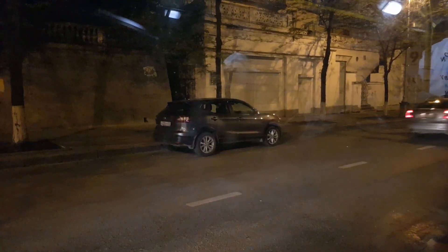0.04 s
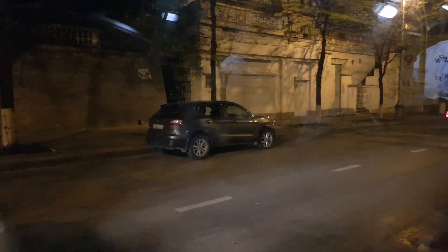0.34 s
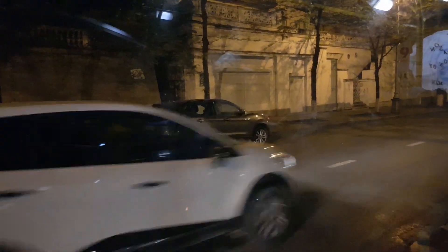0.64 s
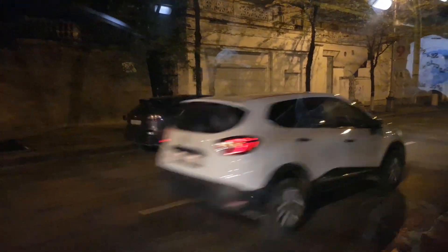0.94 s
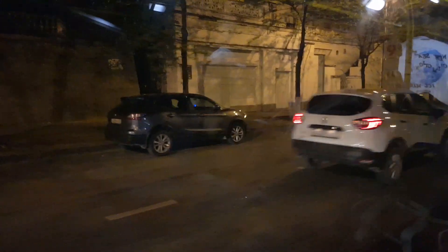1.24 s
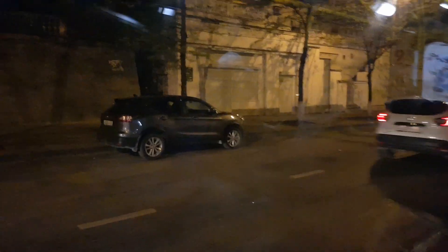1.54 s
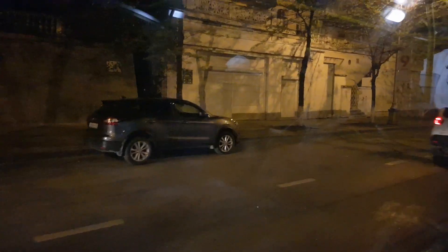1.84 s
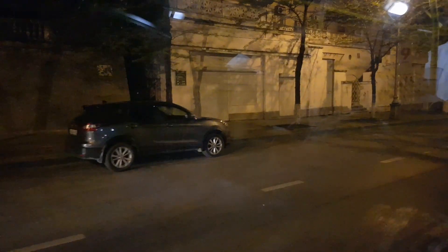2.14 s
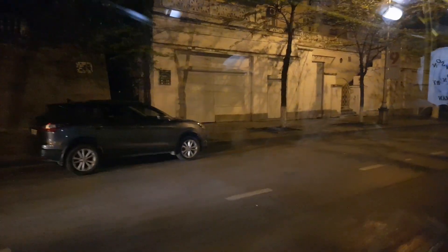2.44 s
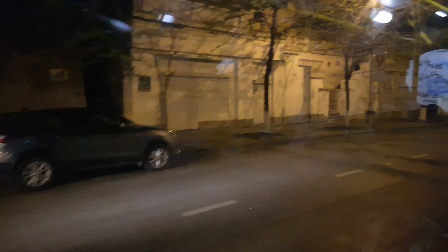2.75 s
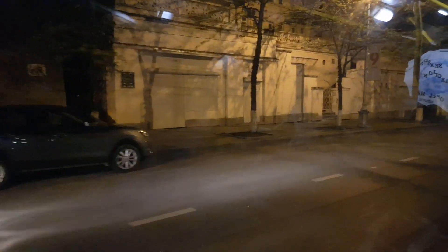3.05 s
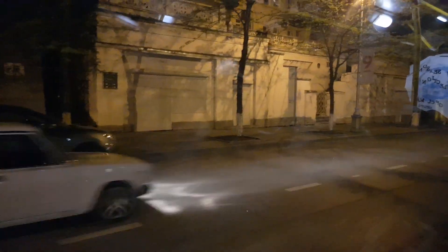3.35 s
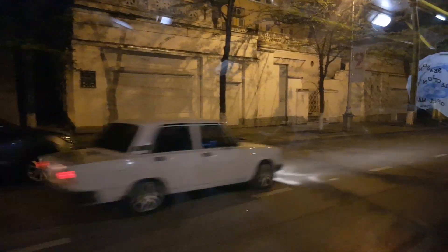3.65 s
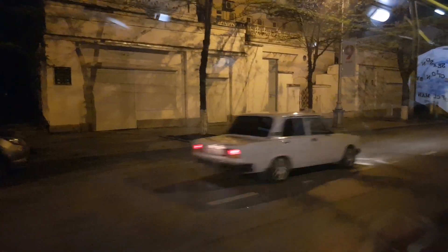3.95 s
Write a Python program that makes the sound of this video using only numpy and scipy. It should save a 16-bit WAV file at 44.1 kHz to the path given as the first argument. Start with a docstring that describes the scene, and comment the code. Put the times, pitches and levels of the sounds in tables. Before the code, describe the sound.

Low rumble of two passing cars fills an idling car's cabin, with soft rattles.

```python
"""Two cars pass on a night street, one accelerating and one droning by, and the harmonics of their exhaust
pulses boom in the cabin of an idling car. Their tyres wash by as broadband noise that excites the cabin's
resonances, over road rumble and brief hums. The idling engine adds low orders and a faint gear whirr.
Air hisses on the right with a thin blower whine. Loose trim rings in short, soft rattles,
the first two with low thumps, and faint squeaks sound at the top of hearing."""
import sys
import numpy as np
from scipy.fft import rfft, irfft, next_fast_len
from scipy.io import wavfile
from scipy.ndimage import map_coordinates

SR = 44100
rng = np.random.default_rng(int(sys.argv[2]) if len(sys.argv) > 2 else 0)


def unload_audio(sound):
    """Save the sound as a 16-bit wav file, at the path given as the first command line argument."""
    columns = np.transpose(np.atleast_2d(sound))
    # keep every value between -1 and 1, then stretch to whole-number steps
    steps = np.round(np.clip(columns, -1, 1) * 32767)
    wavfile.write(sys.argv[1], SR, steps.astype(np.int16))


N = 176400

# The passing cars' exhaust notes. Each row: time in seconds, firing rate in Hz, level in dB.
ACCELERATING_CAR = [(.6, 31.36, -65), (.85, 37.76, -31.5), (1.0, 43.66, -30.5), (1.13, 46.84, -23),
                    (1.27, 53.4, -19.5), (1.43, 57.3, -22), (1.55, 64.5, -27.5), (1.7, 68, -27),
                    (1.79, 68.5, -18.5), (1.89, 74.25, -24), (1.96, 75.7, -35), (2.4, 83.4, -39),
                    (2.6, 85.5, -70)]
DRONING_CAR = [(2.2, 58, -65), (2.36, 58.1, -40), (2.45, 56.56, -21), (2.68, 57.03, -30),
               (2.82, 57.7, -26.5), (3.35, 57.17, -22), (3.55, 56.37, -20), (3.85, 55.8, -18),
               (4, 54.74, -17)]
# The exhaust's harmonics. Each row: multiple of the firing rate, gain in dB.
EXHAUST_HARMONICS = [(1, -0.5), (2, -14.5), (3, -17.5)]
LOW_RIGHT_DB = -15.5  # exhausts and thumps are weaker in the right ear

def exhaust(car):
    """Periodic exhaust pulses form a harmonic series on the firing rate, heard mostly on the left."""
    hz, db = curves(car)
    hz = hz * (1 + 0.015 * wobble(15))
    note = sum(amp(gain) * tone(k * hz) for k, gain in EXHAUST_HARMONICS)
    return note * amp(db + 0.46 * wobble(15)) * amp([[0], [LOW_RIGHT_DB]])


# Street noise spectra. Each row: frequency in Hz, left and right density in dB per Hz before the gain.
BOOM_SPECTRUM = [(15, -84, -84), (28, -76, -80), (35, -65, -71), (44, -36.5, -61), (60, -44.5, -57),
                 (78, -38.5, -55.5), (95.3, -49.5, -58), (141, -88, -101), (300, -120, -120)]
ROAD_SPECTRUM = [(49.4, -65, -102), (95, -57.5, -65.5), (123, -46, -64.5), (144.5, -55.5, -67),
                 (220, -55, -70), (262, -58.5, -66), (310, -64, -67.5), (443, -77.5, -73.5),
                 (860, -77.5, -82), (2000, -130, -130)]
TYRE_SPECTRUM = [(150, -77, -85), (334, -67.5, -74), (470, -69.5, -66.5), (697, -69.5, -70),
                 (842, -74.5, -79), (1050, -75.5, -74), (1164, -78.5, -77.5), (1387, -75, -70.5),
                 (2060, -85.5, -75), (2430, -96, -84), (3980, -110, -105), (8000, -150, -140)]
# The swell of each noise. Each row: time in seconds, gain in dB.
BOOM_GAIN = [(0, -16), (.1, -12), (.3, -8.5), (.7, -10.5), (1.2, -7.5), (2.0, -5), (2.7, -6.5), (3.3, -4.5),
             (3.8, -5), (4, -9)]
ROAD_GAIN = [(0, -1.5), (.3, -1.5), (.65, -3.5), (1.1, -2), (1.8, 0.5), (2.3, 1.5), (2.9, 0.5), (3.1, 5.5),
             (3.35, 7.5), (3.7, -0.5), (4, -2)]
TYRE_GAIN = [(0, -1.5), (.68, -2), (.79, -1), (.9, -1.5), (1.2, -0.5), (2.3, -0.4), (2.6, 1), (2.9, 2.5),
             (3.3, -2), (3.65, -0.5), (4, -5)]
# Cabin resonances. Each row: centre in Hz, width in Hz, left and right peak in dB before the gain.
CABIN_MODES = [(255.5, 33, -59.5, -63.5), (325.5, 17, -59, -67), (370.4, 11, -61, -59.5),
               (482.7, 34, -70, -62), (962, 65, -73, -74.5)]

def street():
    """Forced resonance: broadband tyre noise drives the cabin's modes, above low boom and road rumble."""
    boom = noise(BOOM_SPECTRUM, alike=1.0) * amp(curves(BOOM_GAIN)[0] + 1.03 * wobble(6.74))
    road = noise(ROAD_SPECTRUM, alike=0.93, lag_s=0.00048)
    road *= amp(curves(ROAD_GAIN)[0] + 0.4 * wobble(8.6))
    tyres = noise(TYRE_SPECTRUM, alike=0.54, lag_s=0.00023) + ringing(CABIN_MODES, alike=0.47)
    tyres *= amp(curves(TYRE_GAIN)[0] + 1.37 * wobble(24.74))
    return boom + road + tyres


# Hums in the traffic. Each row: peak time in seconds, pitch in Hz, right level in dB,
# half length in seconds, left ear's gain in dB.
TRAFFIC_HUMS = [(0.785, 107.7, -39.5, 0.026, 13.5), (0.79, 380, -37.5, 0.025, -1),
                (1.071, 138.8, -44, 0.042, 15), (1.084, 335, -45, 0.091, -14),
                (1.54, 181, -44, 0.085, 15.5), (1.695, 331.1, -39.5, .055, -17),
                (2.804, 342.5, -39, 0.047, -3), (2.852, 392, -38.5, 0.04, -4), (2.972, 443, -37, 0.085, -6),
                (3.009, 179.9, -39.5, 0.065, 12.5)]

def hums():
    """Brief wavering tones swell as the cars go by, placed by interaural time and level differences."""
    both = sum(amp(db) * swell(s, half) * tone(hz + 4 * wobble(30)) * amp([[left], [0]])
               for s, hz, db, half, left in TRAFFIC_HUMS)
    return filtered(both, lambda hz: left_delay(hz, lag_s=0.0004))


# Engine and gear orders. Each row: multiple of the firing rate, left and right level in dB.
ENGINE_ORDERS = [(1, -36.5, -53), (2, -41, -53), (3, -38, -57.5), (4, -43.5, -59.5), (5, -49.5, -62.5)]
GEAR_ORDERS = [(15, -61, -58), (20, -63, -60), (27, -58, -56), (28, -52, -52), (29, -66, -56),
               (31, -68, -60), (32, -66, -57)]
# The swell of the gear whirr. Each row: time in seconds, gain in dB.
GEAR_GAIN = [(0, -16), (1.0, -2.5), (1.55, -4), (1.78, 1.5), (1.95, -0.5), (2.15, -7.5), (2.42, -0.5),
             (2.6, -5), (3.45, -6), (3.65, -2.5), (4, -8)]
FIRING_HZ = 60.61

def idle():
    """Steady rotation sounds at multiples of the firing rate: low engine orders and a thin gear whirr."""
    hz = FIRING_HZ * (1 + 0.001 * wobble(12))
    low = sum(amp([[left], [right]]) * tone(k * hz + 1.314 * wobble(14)) * amp(2 * wobble(12))
              for k, left, right in ENGINE_ORDERS)
    # fast frequency modulation blurs each gear order by a few Hz
    whirr = sum(amp([[left], [right]]) * tone(k * hz + 4 * wobble(60)) * amp(2.2 * wobble(14))
                for k, left, right in GEAR_ORDERS)
    whirr = filtered(whirr, lambda f: left_delay(f, lag_s=0.00012))
    return low + whirr * amp(curves(GEAR_GAIN)[0])


# Air hiss. Each row: frequency in Hz, left and right density in dB per Hz before the gain.
AIR_SPECTRUM = [(400, -100, -140), (1060, -87, -83.5), (1860, -83, -76), (2540, -91.5, -77.5),
                (3600, -97.5, -79.5), (5040, -99, -78.5), (6170, -107, -80), (7110, -123, -88.5),
                (8000, -136, -105), (8820, -132, -97), (12100, -115, -94), (14000, -116, -98),
                (16000, -117, -97)]
# The drift of the hiss. Each row: time in seconds, gain in dB.
AIR_GAIN = [(0, 0), (.17, -1.2), (.45, -0.5), (.8, -0.5), (1.3, .5), (2.6, 0.4), (3.4, 0.5), (3.75, -1),
            (4, -2.5)]
# The blower's whine. Each row: time in seconds, pitch in Hz, right level in dB.
BLOWER_WHINE = [(0, 3015, -76), (.55, 3000, -59), (.9, 3010, -57), (1.4, 2997, -47.5), (1.95, 3000, -53.5),
                (2.3, 3014, -51.5), (2.6, 2996, -57), (2.9, 2972, -56.5), (3.15, 2968, -53),
                (3.7, 2976, -58), (4, 3002, -60)]
WHINE_NOISE_SHARE = 0.45

def ventilation():
    """Moving air hisses; random modulation spreads part of the blower's tone into a narrow band."""
    air = noise(AIR_SPECTRUM, alike=0.058) * amp(curves(AIR_GAIN)[0] + 0.41 * wobble(20))
    hz, db = curves(BLOWER_WHINE)
    flutter = np.sqrt(WHINE_NOISE_SHARE / 2) * (wobble(80) + 1j * wobble(80))
    carrier = np.exp(2j * np.pi * np.cumsum(hz) / SR)
    whine = unit(np.real((np.sqrt(1 - WHINE_NOISE_SHARE) + flutter) * carrier))
    return air + whine * amp(db) * amp([[-17], [0]])


# Trim rattles. Each row: start in seconds, noise gain in dB, tilt in dB per octave,
# time to fall 60 dB in seconds, the loose part's pitch in Hz, its right level in dB.
TRIM_RATTLES = [(0.1, -7, -1.5, 0.11, 1400, -41.5), (0.515, -12, 5.5, 0.34, 2960, -46.5),
                (1.162, -13, -11, 0.027, 700, -48), (2.698, -11, 4.5, 0.25, 2940, -45),
                (3.096, -1, -4, 0.17, 4380, -46), (3.108, -5, -1, 0.24, 1380, -38.5)]
# Rattle noise. Each row: frequency in Hz, left and right density in dB per Hz before gain and tilt.
TRIM_SPECTRUM = [(250, -80, -74), (710, -75, -66), (1300, -70, -73), (2000, -80, -63.5), (2670, -80, -64),
                 (3570, -92, -70.5), (5500, -94, -71), (6500, -103, -74), (8200, -130, -102),
                 (8900, -120, -85.5), (12500, -108, -88), (15500, -115, -89)]
# Trim modes. Each row: centre in Hz, width in Hz, left and right peak in dB before gain and tilt.
TRIM_RESONANCES = [(1060, 35, -62, -56), (1187, 36, -65, -55), (1410, 36, -76, -72), (1896, 22, -60, -53),
                   (2530, 86, -72, -59.5), (3040, 54, -94, -76), (4480, 99, -87, -68), (5050, 70, -90, -66)]
RATTLE_RISE_S, RATTLE_HOLD_S = 0.007, 0.016

def rattles():
    """Damped vibration: grainy bursts ring the trim's modes and the loose part's note, then decay."""
    grains = unit(amp(1.3 * wobble(400)))
    octaves = lambda hz: np.log2(np.clip(hz, 500, 4000) / 2000)
    out = np.zeros((2, N))
    for s, db, tilt_db, t60, ring_hz, ring_db in TRIM_RATTLES:
        t = clock() - s
        rise = np.clip(t / RATTLE_RISE_S, 0, 1)
        decay = amp(-60 * np.maximum(t - RATTLE_HOLD_S, 0) / t60)
        trim = grains * noise(TRIM_SPECTRUM, alike=0.077) + ringing(TRIM_RESONANCES, alike=0.043)
        trim = filtered(trim, lambda hz: amp(db + tilt_db * octaves(hz)))
        ring = tone(ring_hz + 22 * wobble(300)) * amp(ring_db) * amp([[-10], [0]])
        out += rise * decay * (ring + trim)
    return out


# Jolts that come with the first rattles. Each row: peak time in seconds, left level in dB.
BODY_JOLTS = [(.115, -27), (.51, -22)]
THUMP_HZ, THUMP_HALF_S = 61.4, 0.017

def thumps():
    """Transient response: the car's body gives a few low cycles at each jolt."""
    body = sum(amp(db) * swell(s, THUMP_HALF_S) * tone(np.full(N, THUMP_HZ)) for s, db in BODY_JOLTS)
    return body * amp([[0], [LOW_RIGHT_DB]])


# Thin squeaks. Each row: peak time in seconds, right level in dB, half length in seconds.
HIGH_SQUEAKS = [(.3, -57, .02), (.48, -57, .01), (1.045, -53, .025), (1.217, -54, 0.034),
                (1.557, -56, 0.012), (1.617, -56, 0.035), (1.787, -51, 0.011), (1.899, -51, 0.022),
                (2.241, -51, 0.0068), (3.559, -60, 0.017)]
SQUEAK_HZ, SQUEAK_HALF_WIDTH_HZ = 15000, 300

def squeaks():
    """Narrow-band noise is heard as a pitch: brief, very high squeaks on the right."""
    peak = lambda hz: 1 / (1 + ((hz - SQUEAK_HZ) / SQUEAK_HALF_WIDTH_HZ) ** 2)
    band = unit(filtered(rng.standard_normal(N), peak))
    level = sum(amp(db) * swell(s, half) for s, db, half in HIGH_SQUEAKS)
    return band * level * amp([[-23], [0]])


def stereo_noise(response, alike):
    """Partial coherence: filtered white noise of which the two ears share the power fraction alike."""
    white = np.sqrt(alike) * rng.standard_normal(N) + np.sqrt(1 - alike) * rng.standard_normal((2, N))
    return filtered(white, response) * np.sqrt(SR / 2)


def noise(spectrum, alike, lag_s=0):
    """Spectral shaping gives each ear its own noise colour; the left ear may lag."""
    f, left, right = np.transpose(spectrum)
    def colour(hz):
        db = np.array([np.interp(np.log(hz + 1), np.log(f), ear) for ear in (left, right)])
        return amp(db) * left_delay(hz, lag_s)
    return stereo_noise(colour, alike)


def ringing(modes, alike):
    """Resonance: noise passes through narrow Lorentzian peaks, each with a level for each ear."""
    def response(hz):
        return sum(amp([[left], [right]]) / (1 + (2 * (hz - centre) / width) ** 2)
                   for centre, width, left, right in modes)
    return stereo_noise(response, alike)


def tone(hz):
    """A sine of rms 1 whose phase is the integral of its frequency."""
    return np.sqrt(2) * np.sin(2 * np.pi * (np.cumsum(hz) / SR + rng.random()))


def filtered(x, response):
    """Linear filtering multiplies the spectrum by a frequency response."""
    m = next_fast_len(N + SR // 2)
    return irfft(rfft(x, m) * response(np.fft.rfftfreq(m, 1 / SR)), m)[..., :N]


def left_delay(hz, lag_s):
    """A linear phase response that delays the left ear."""
    return np.exp(-2j * np.pi * hz * np.array([[lag_s], [0]]))


def swell(peak_s, half_s):
    """A Gaussian envelope that is down to 1/e at half_s from its peak."""
    return np.exp(-((clock() - peak_s) / half_s) ** 2)


def wobble(rate):
    """A smooth random curve, rate knots a second."""
    return map_coordinates(rng.standard_normal(int(N * rate / SR) + 4), [clock() * rate], mode="nearest")


def curves(rows):
    """Linear interpolation of each column after the time, one value per sample."""
    s, *columns = np.transpose(rows)
    return [np.interp(clock(), s, column) for column in columns]


def clock():
    """Time of each sample in seconds."""
    return np.arange(N) / SR


def amp(db):
    """Decibels to gain."""
    return 10 ** (np.asarray(db) / 20)


def unit(x):
    """Scale to rms 1."""
    return x / np.sqrt(np.mean(x ** 2) + 1e-20)


def scene():
    """Superposition: the traffic and the car's own sounds add in the cabin."""
    traffic = exhaust(ACCELERATING_CAR) + exhaust(DRONING_CAR) + street() + hums()
    return traffic + idle() + ventilation() + rattles() + thumps() + squeaks()


def record(dry):
    """An ideal low-pass filter removes everything above 15780 Hz."""
    return filtered(dry, lambda hz: hz < 15780)


dry = scene()
out = record(dry)
unload_audio(out)
```